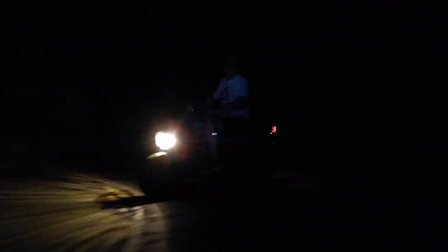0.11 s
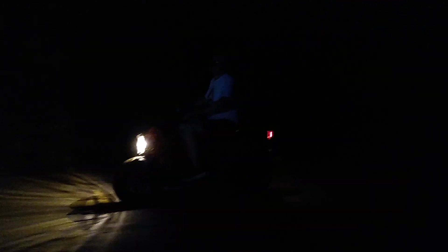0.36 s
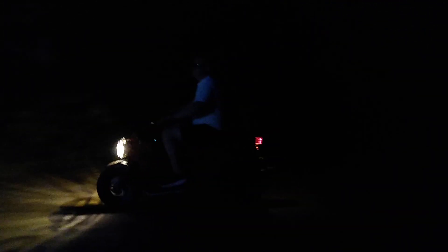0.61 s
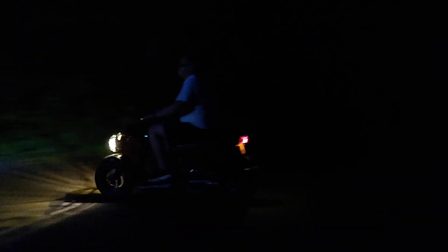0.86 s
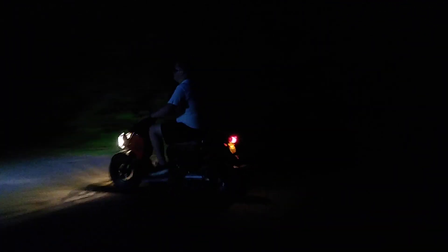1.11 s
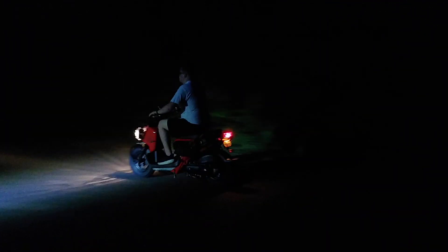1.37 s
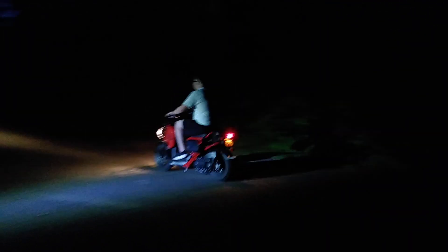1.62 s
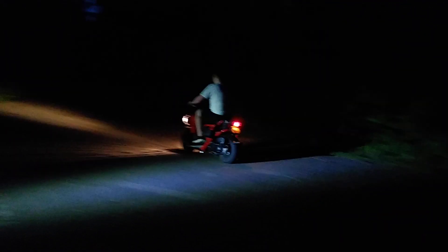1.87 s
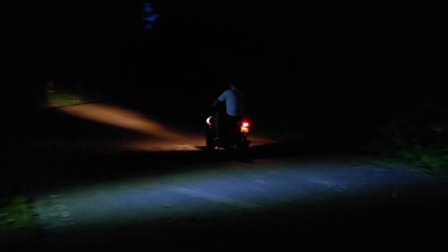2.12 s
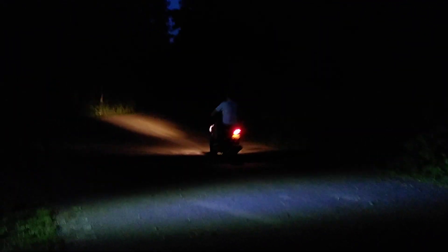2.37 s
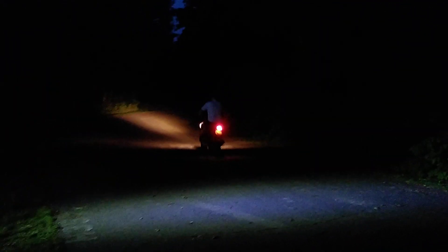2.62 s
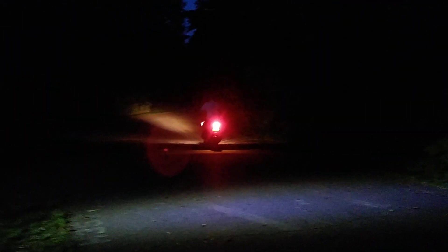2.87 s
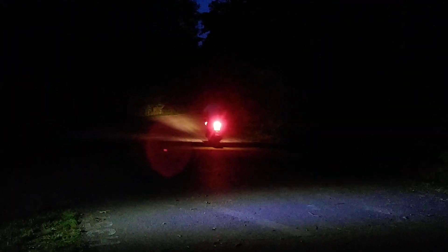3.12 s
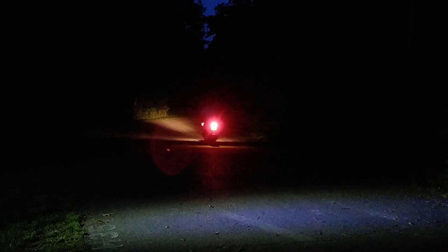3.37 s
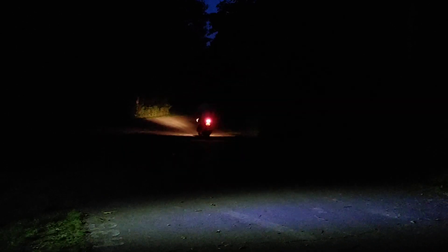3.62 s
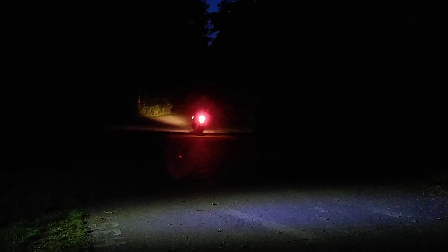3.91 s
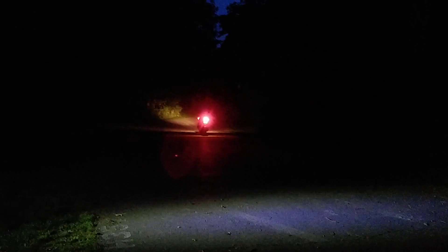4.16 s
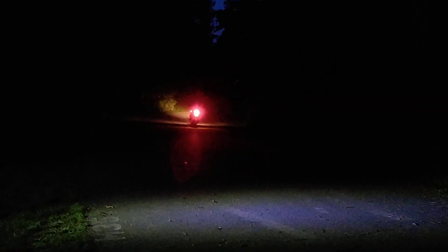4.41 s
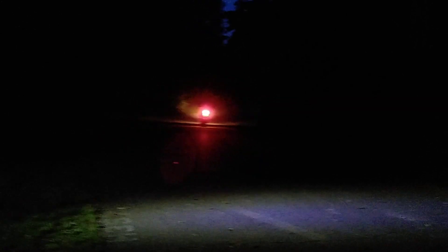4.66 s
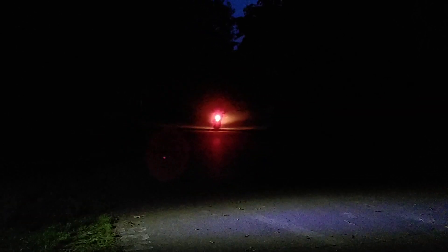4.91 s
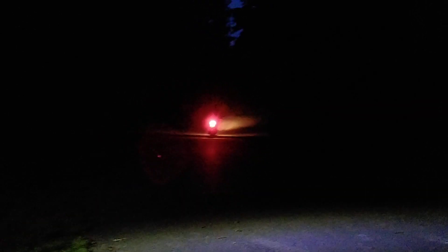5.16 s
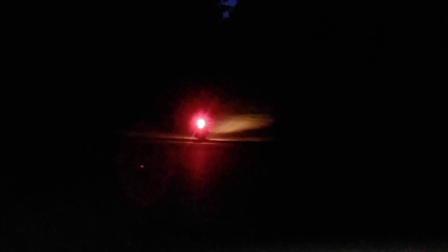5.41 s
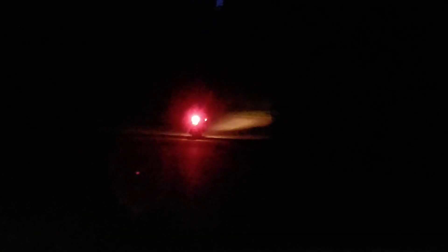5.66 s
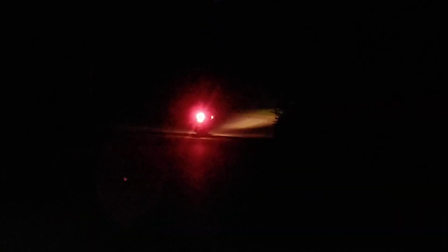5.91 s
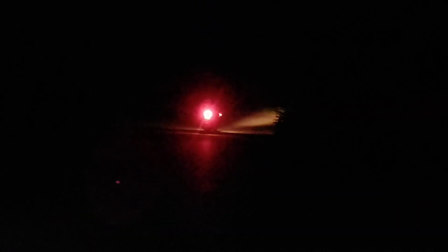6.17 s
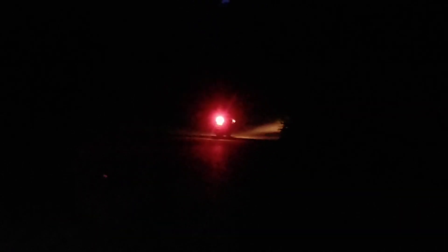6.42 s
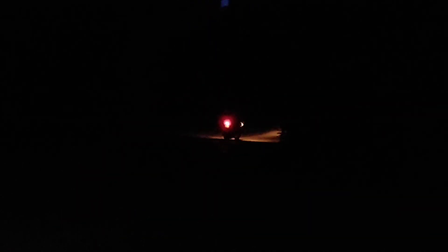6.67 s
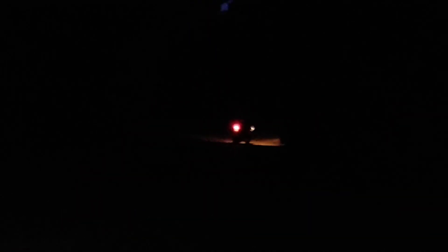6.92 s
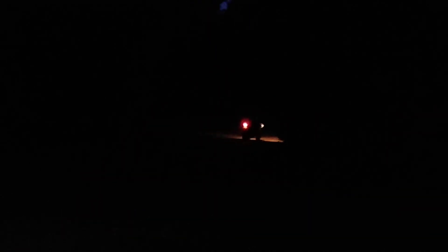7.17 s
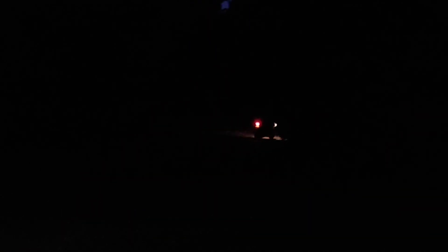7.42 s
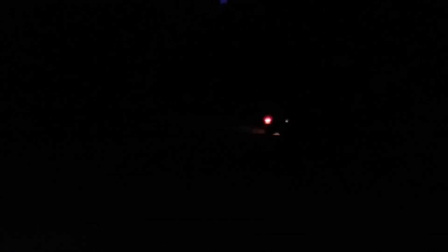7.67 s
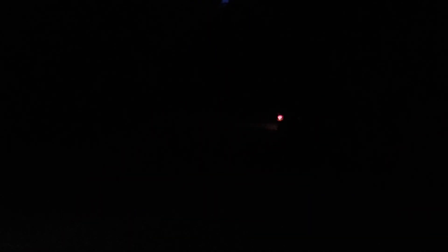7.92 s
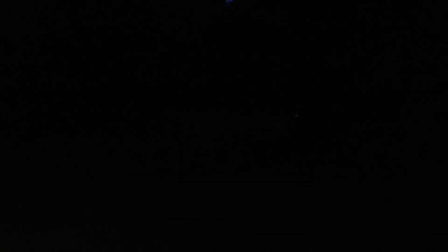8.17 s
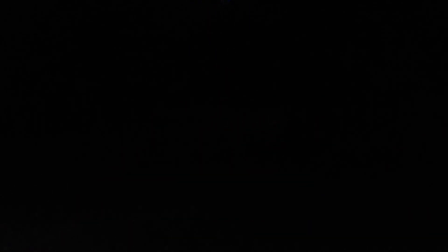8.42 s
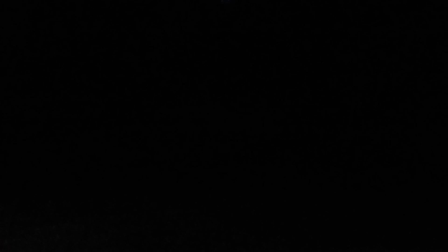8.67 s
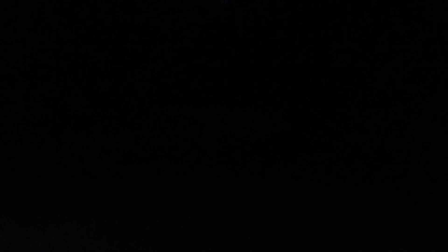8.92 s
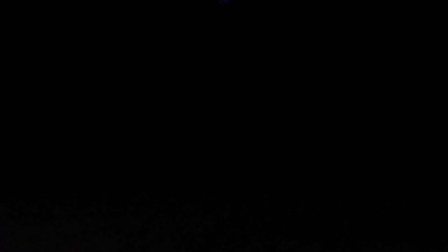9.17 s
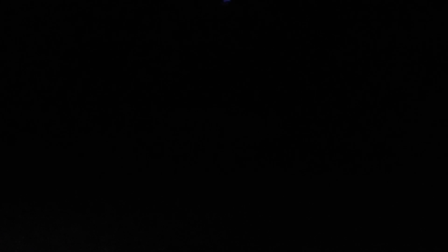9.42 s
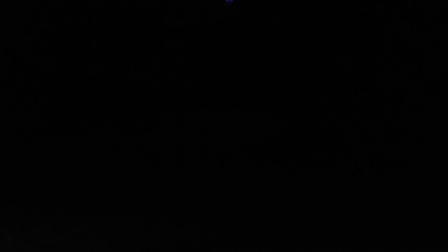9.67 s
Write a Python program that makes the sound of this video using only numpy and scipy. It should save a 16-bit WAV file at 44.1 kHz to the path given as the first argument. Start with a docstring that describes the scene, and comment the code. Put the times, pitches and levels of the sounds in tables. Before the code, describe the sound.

From 0 s a small single-cylinder scooter is already close, engine pulling at about 43 firings per second: a low rapid putter with crank hum, intake growl, mechanical clatter and pulsing airy hiss. Around 1 s a bright metallic buzz swells as it passes, then the sound gradually darkens and falls. Tiny grit ticks occur near 0.1 and 2.5 s, with a soft scuff near 3 s. At 3.2 s the throttle snaps shut; level drops and the pitch sinks, the firing becoming lumpy with missed beats. From 4.3 to 8.3 s a very faint, wavering gear whine accompanies the receding coast. Quick, quiet cricket chirps emerge after about 4.5 s over a thin steady trill, soft night air and distant road murmur. Around 8.5 s the far engine opens up again, smoothly rising but remaining faint until the end at 9.8 s. Outdoor stereo pickup, treble leaning left.

```python
"""On a night road a small single-cylinder four-stroke scooter pulls away from the listener, coasts with
the throttle shut, missing some firings, and opens up again far off. Its exhaust, crank, intake and
casing are pulses, sines and noise locked to the engine cycle and shaped by resonances. Grit ticks are
noise bursts, crickets are sliding or pulsed tones, and the night air is steady shaped noise."""
import sys
import numpy as np
from scipy import signal
from scipy.fft import rfft, irfft, next_fast_len
from scipy.io import wavfile
from scipy.ndimage import uniform_filter1d, map_coordinates

SR = 44100
rng = np.random.default_rng(int(sys.argv[2]) if len(sys.argv) > 2 else 0)


def store_pcm(level_fs):
    """Save levels as 16-bit WAV."""
    pcm = np.round(np.clip(level_fs, -1, 1) * 32767).astype(np.int16)
    wavfile.write(sys.argv[1], SR, np.atleast_2d(pcm).T)


def gain_from_decibels(decibels):
    """Convert decibel values to linear amplitude factors."""
    exponent = np.asarray(decibels, float) / 20
    return 10 ** exponent


N = 431738  # length [samples]

# throttle: (time [s], opening [0-1])
THROTTLE = [(0, 1), (3.2, 1), (3.28, 0), (8.45, 0), (8.7, .75), (9.79, .8)]
# engine speed: (time [s], firing rate [1/s])
FIRING_RATE = [(0.0, 43.2), (0.35, 43.7), (1.03, 43.2), (2.34, 43.3), (2.92, 44.2), (3.22, 43.2),
               (3.35, 40.7), (3.54, 39.2), (4.12, 37.1), (5.07, 35.5), (7.14, 33.1), (7.88, 33.1),
               (8.42, 32.1), (8.53, 32.6), (8.7, 34.8), (8.92, 37.3), (9.24, 38.8), (9.79, 40.1)]
# scooter drawing away: (time [s], loss by distance [dB], share of the tail turned to the listener [0-1])
PATH = [(0, -2.5, 0.4), (.4, -.5, 0.4), (.95, -0.5, 0), (1.4, -1.5, 0.9), (2, -3.5, 0.5), (2.6, -5, 0.5),
        (3.1, -6.5, .9), (3.4, -10, 1), (4.1, -13.5, 1), (4.3, -14, 1), (5.3, -15.5, 0.9),
        (5.7, -18.5, 0.6), (6.3, -21, .7), (7.1, -21, 0), (7.8, -23, 0.3), (8.6, -26.5, 0.2),
        (9.1, -27.5, 0.3), (9.79, -28.5, 1)]
# exhaust note and the crank hum under it: (time [s], note level [dB], hum level [dB])
EXHAUST = [(0.0, -42, -45), (0.08, -42.5, -43.5), (0.92, -38.5, -46), (1.63, -45, -42), (2.31, -48, -49),
           (2.67, -47.5, -48.5), (3.22, -52.5, -51), (3.27, -47.5, -47.5), (3.68, -52, -46),
           (4.91, -53, -59), (5.78, -58, -70), (7.44, -64, -62), (7.66, -70, -65), (7.85, -63.5, -61),
           (9.0, -64, -72.5), (9.79, -64.5, -65.5)]
# levels over the exhaust note: (pulling [dB], coasting [dB])
THUMP_OVER_NOTE = (0.5, 1)
BARK_OVER_NOTE = (-13.5, -15)
# change of the bark with loss by distance [dB per dB]
BARK_PER_LOSS = -0.15
# intake, casing, gas jet and heat shield: (level when nearest [dB], fading over the loss by distance [dB per dB],
# gain from the tail [dB], gain with the throttle shut [dB])
INTAKE_LEVEL = (-41.5, 1.26, 0.5, 1.5)
CASING_LEVEL = (-41.5, 1.11, 1, 0.5)
JET_LEVEL = (-40.5, 1.59, -0.5, 2.5)
SHIELD_LEVEL = (-52.5, 1.64, 4.5, -4.5)
# heat shield swinging past the listener: (gain [dB], time [s], stay [s])
SHIELD_FACES = (9.8, 1.06, 0.27)
# resonances of tail pipe, silencer after-ring, air box and heat shield:
# (frequency [Hz], width [Hz], relative level [dB])
TAIL_PIPE = [(309, 360, 0)]
SILENCER = [(143, 26, 0)]
AIR_BOX = [(469, 105, 3.5), (644, 140, 2)]
SHIELD = [(4593, 370, 0.5), (4910, 80, -2.5)]
# bands of body rattle: (frequency [Hz], width [Hz], relative level [dB], time when loudest [s], stay [s])
RATTLE = [(790, 33, 1, 6.3, 0.81), (1064, 230, -1, 2.4, 2.6), (1710, 170, 0.5, 1.18, 0.67),
          (2006, 105, 4.5, 3.36, 1.3), (2244, 200, 6.5, 1.28, 0.93), (3050, 150, 0, 0.32, 0.38),
          (1584, 170, 1.5, 1.34, 0.34), (2740, 160, 1, 2.46, 0.21), (3760, 250, -1, 1.1, 0.75),
          (1860, 280, 4, 9.8, 0.84), (2700, 310, 3.5, 8.6, 1.8)]
# magneto poles and timing chain teeth, before their common gain:
# (multiple of the firing rate [1], pulling [dB], coasting [dB])
WHINES = [(12, -18, -16), (34, -18, -25), (36, -17, -25)]
# final drive whine: (time [s], pitch [Hz], level [dB])
GEARS = [(4.3, 1640, -75), (5.3, 1600, -69), (6, 1560, -71), (6.8, 1520, -74), (7.3, 1470, -82),
         (7.9, 1420, -77), (8.3, 1400, -79)]
# reflection off the road: (time [s], extra delay [ms], strength [0-1])
BOUNCE = [(0, 0.1, 0.2), (7.2, 0.22, 0.22), (7.8, 0.22, 0.6), (8.5, 0.26, 0.8), (9, 0.2, 0.06),
          (9.79, 0.89, 0.1)]
# noise spectra of casing, gas jet, night air and far road murmur: (frequency [Hz], relative density [dB per Hz])
CASING = [(410, -28), (700, -21.5), (783, -3.5), (1130, -5.5), (1530, -3.5), (1670, -4.5), (2780, -7),
          (4150, -18.5), (5390, -19), (5920, -26.5), (6500, -59), (8450, -36), (14300, -120)]
JET = [(3240, 7.5), (5500, 2.5), (5990, -0.5), (6690, -0.5), (8040, -1), (8950, 1.5), (14600, 1),
       (16000, -4.5), (16500, -42)]
NIGHT_AIR = [(380, -28), (650, 1), (1130, -12), (1360, -8.5), (2350, 3.5), (2760, 1), (3430, -11),
             (4990, -3), (5480, -3.5), (6180, -16), (14000, -12), (16000, -27)]
ROAD_MURMUR = [(30, -14), (55, 0), (150, -1), (450, -6.5), (700, -14), (1000, -31)]
# grit ticks and a scuff under the tyres:
# (time [s], level before filtering [dB], decay [s], left minus right [dB], band centre [Hz])
GRIT = [(0.05, -32.5, 0.00061, 4, 10900), (0.093, -38, 0.0033, 5, 13100), (2.448, -27, 0.00046, -6, 13000),
        (2.503, -31, 0.00092, -3, 14000), (2.98, -45.5, 0.042, -9, 11200), (4.274, -38, 0.0021, -6, 2500)]
# first wing stroke of each bush cricket chirp: (time [s])
BUSH_CHIRPS = [4.97, 5.2, 5.5, 5.81, 6.115, 6.38, 6.645, 6.91, 7.16, 7.445, 7.735, 8.005, 8.29, 8.595, 8.87,
               9.145, 9.415, 9.735]
# first wing stroke of each field cricket chirp: (time [s])
FIELD_CHIRPS = [4.58, 4.88, 5.14, 5.5, 5.86, 6.25, 6.59, 6.96, 7.29, 7.64, 7.97, 8.58, 8.915, 9.23, 9.505,
                9.75]
# microphone ports: (frequency [Hz], left-right likeness [0-1])
LIKENESS = [(60, 0.67), (110, 1), (200, 0.99), (380, 0.88), (700, 0.93), (1290, 0.65), (2380, 0.23),
            (4400, 0.27), (8120, 0.16), (15000, 0.04)]
# microphone ports: (frequency [Hz], left minus right [dB])
LEFT_TILT = [(60, 0.5), (130, 1.5), (290, 1.5), (640, 2.5), (1410, 0), (3100, 4), (6820, 5), (15000, 9.5)]


def unit(x):
    """Normalisation to unit rms."""
    return x / np.sqrt(np.mean(x ** 2) + 1e-20)


def along(points, hz):
    """Interpolation of (Hz, value) points on a logarithmic frequency axis."""
    f, v = np.transpose(points)
    return np.interp(np.log(hz + 1), np.log(f + 1), v)


def curves(rows):
    """Linear interpolation in time: one value per sample for each column after the time."""
    s, *cols = np.transpose(rows)
    return [np.interp(np.arange(N) / SR, s, c) for c in cols]


def wobble(rate):
    """Smooth random modulation, with rate knots a second."""
    return map_coordinates(rng.standard_normal(int(N * rate / SR) + 4), [np.arange(N) * rate / SR])


def by_load(opening, pulling, coasting):
    """Linear blend between the pulling and the coasting value by throttle opening."""
    return opening * pulling + (1 - opening) * coasting


def filtered(x, response):
    """Linear filtering: multiplication by a complex response of frequency."""
    m = next_fast_len(N + 8192)
    return irfft(rfft(x, m) * response(np.fft.rfftfreq(m, 1 / SR)), m)[..., :N]


def resonances(modes):
    """Modal sum of causal second-order resonances, with alternating signs."""
    def response(f):
        total = 0
        for k, (centre, width, db) in enumerate(modes):
            damping = 1j * f * width
            total = total + (-1) ** k * gain_from_decibels(db) * damping / (centre * centre - f * f + damping)
        return total
    return response


def ports(a, b, locked):
    """Partial coherence: a reaches both ports alike; b, and a shifted in phase by the share locked, oppose."""
    def responses(hz):
        angle = np.arccos(np.clip(along(LIKENESS, hz), -1, 1)) / 2
        share = np.clip(locked, 0, 1) / (1 + (hz / 7000) ** 2)
        shift = 1j * np.tanh((hz - 1500) / 300) * share * np.sin(angle)
        return [np.cos(angle), shift, np.sqrt(1 - share ** 2) * np.sin(angle)]
    mid, shifted, other = filtered(np.array([a, a, b]), responses)
    return np.array([mid + shifted + other, mid - shifted - other])


def rush(spectrum, gate, patchy_db, locked=0.81):
    """Turbulence as stereo noise of unit rms, pulsed by gate, with random gain in patches of time and pitch."""
    z = signal.stft(gate * rng.standard_normal((2, N)), nperseg=512)[2]
    field = uniform_filter1d(rng.standard_normal(z.shape[1:]), 4, 0)
    field = uniform_filter1d(field, 20, 1)
    pair = signal.istft(z * gain_from_decibels(patchy_db * unit(field)), nperseg=512)[1][:, :N]
    shaped = filtered(pair, lambda hz: gain_from_decibels(along(spectrum, hz)))
    return unit(ports(*shaped, locked))


def repeating(turns, rate):
    """Cyclostationary noise: valves, chain and piston strike at the same crank angles; the pattern drifts."""
    patterns = rng.standard_normal((int(N * rate / SR) + 4, 256))  # drifting patterns x places in the cycle
    return map_coordinates(patterns, [np.arange(N) * rate / SR, np.mod(turns, 1) * 255], order=1)


def scooter():
    """Superposition of exhaust, crank, intake and casing, all locked to the cycle of two crank turns."""
    opening, = curves(THROTTLE)
    thump_db, bark_db, hum_db, intake_db, casing_db, jet_db, shield_db = levels(opening)
    turns, starts, u, size = engine_cycle(opening)
    puff = size * np.exp(-np.mod(u, 1) / 0.34) * np.clip(np.mod(u, 1) / 0.14, 0, 1)  # jet after each blow-down
    low = gain_from_decibels(thump_db) * exhaust_thump(opening, u, size) + gain_from_decibels(bark_db) * exhaust_bark(u, size)
    low = low + gain_from_decibels(hum_db) * crank_hum(opening, turns) + gain_from_decibels(intake_db) * intake(opening, turns, starts)
    body = gain_from_decibels(casing_db) * casing(opening, turns) + heat_shield(puff, shield_db)
    jet = gain_from_decibels(jet_db + 0.27 * wobble(7.5)) * gas_jet(opening, puff)
    return low + bounced(body + gears()) + jet


def levels(opening):
    """Propagation and directivity: level in dB of each part from distance, heading and throttle."""
    loss_db, tail = curves(PATH)
    note_db, hum_db = curves(EXHAUST)
    parts = [near_db + fades * loss_db + tail_db * np.clip(tail, 0, 1) + shut_db * (1 - opening)
             for near_db, fades, tail_db, shut_db in (INTAKE_LEVEL, CASING_LEVEL, JET_LEVEL, SHIELD_LEVEL)]
    thump_db = note_db + by_load(opening, *THUMP_OVER_NOTE)
    bark_db = note_db + by_load(opening, *BARK_OVER_NOTE) + BARK_PER_LOSS * loss_db
    return [thump_db, bark_db, hum_db, *parts]


def engine_cycle(opening):
    """Phase of the four-stroke cycle, the integral of firing rate, with its starts and firing strengths."""
    rate, = curves(FIRING_RATE)
    turns = np.cumsum(rate * (1 + .002 * wobble(15))) / SR + .02  # in cycles of two crank turns
    cycle = turns.astype(int)
    starts = np.flatnonzero(np.diff(cycle, prepend=-1))
    luck = rng.random((len(starts), 3))
    size = firings(opening[starts], luck[:, :2])[cycle]
    u = turns - cycle - .5  # place in the cycle, 0 when the exhaust valve opens
    u = u - .04 * (1 - opening) * (luck[cycle, 2] - .5)  # a thin charge burns early or late
    return turns, starts, u, size


def firings(opening, luck):
    """Charge starvation: with the throttle shut the cylinder misses once the charge has run thin."""
    size, run = np.ones(len(luck)), 0  # run: firings since the last miss
    for k, (risk, spread) in enumerate(luck):
        missed = risk < (1 - opening[k]) * [0, .25, .7, .9][min(run, 3)]
        size[k] = (.33 if missed else 1) * gain_from_decibels((4 - opening[k]) * (spread - .5))
        run = 0 if missed else run + 1
    return size


def exhaust_thump(opening, u, size):
    """Blow-down: one pressure swing, as long as the valve timing makes it and sharper under load."""
    window = np.exp(-(u / (.14 - 0.012 * opening)) ** 2)
    swing = size * np.sin(2 * np.pi * (3.83 + .5 * opening) * u - .3) * window
    after_ring = (.7 - 0.4 * opening) * filtered(swing, resonances(SILENCER))
    # gas churning in the silencer
    rumble = rush([(40, -18), (75, 3.5), (130, -4.0), (220, 3.5), (400, -30.0)], 1, patchy_db=3.0)
    return unit(swing + after_ring) + gain_from_decibels(-8.5 - 5 * opening) * rumble


def exhaust_bark(u, size):
    """Impulsive excitation: the steep front of the blow-down swing rings the tail pipe."""
    edge = -size * np.exp(-((u + .06) / .02) ** 2)
    return unit(filtered(edge, lambda f: resonances(TAIL_PIPE)(f) ** 2))


def crank_hum(opening, turns):
    """Periodic forcing: a sine once per crank turn and, with the throttle open, one per two turns."""
    per_turn = (.45 + .55 * opening) * gain_from_decibels(.8 * wobble(8)) * np.sin(4 * np.pi * turns - .6)
    per_cycle = gain_from_decibels(-8.5) * opening * np.sin(2 * np.pi * turns - 1.2)
    return np.sqrt(2) * (per_turn + per_cycle)


def intake(opening, turns, starts):
    """Cavity resonance: the intake valve snaps open half a cycle away and rings the air box."""
    gulps = np.zeros(N)
    gulps[starts] = gain_from_decibels(2.5 * rng.standard_normal(len(starts)))
    gulps = unit(gulps) + 3.5 * repeating(turns, rate=1.6)  # valve gear keeps the box ringing between gulps
    box = unit(filtered(gulps, lambda f: resonances(AIR_BOX)(f) ** 2))
    # air through the filter
    draught = rush([(200, -25), (420, -3), (650, 0), (800, -12), (1500, -40)], 1, patchy_db=1.5)
    return gain_from_decibels(-3.5 - 8 * (1 - opening)) * box + gain_from_decibels(-2.5 - .5 * opening) * draught


def casing(opening, turns):
    """Structure-borne sound: clatter pulsing with the crank, knocks as body rattle, and whines."""
    clatter = rush(CASING, 1 + 0.11 * np.cos(4 * np.pi * turns), patchy_db=1.5)
    rattle = body_rattle(repeating(turns, rate=4.5))
    whine = np.zeros(N)
    for order, pulling_db, coasting_db in WHINES:
        level_db = by_load(opening, pulling_db, coasting_db) + 2 * wobble(4)
        whine += gain_from_decibels(level_db) * np.sin(2 * np.pi * order * turns)
    return gain_from_decibels(-1.0) * clatter + gain_from_decibels(-3.0) * rattle + gain_from_decibels(5) * whine


def body_rattle(knocks):
    """Resonant response: the knocks ring bands of body rattle, each swelling around its own time."""
    t = np.arange(N) / SR
    rings = np.zeros(N)
    for hz, width, db, s, stay in RATTLE:
        swell = 0.28 + np.exp(-((t - s) / stay) ** 2)
        rings += swell * gain_from_decibels(1.36 * wobble(3.03)) * filtered(knocks, resonances([(hz, width, db)]))
    return unit(ports(rings, np.roll(rings, SR // 8), locked=0.95))


def gas_jet(opening, puff):
    """Jet noise: hiss that swells with the gas puff of each firing, plus the steady hiss of the drive belt."""
    hiss = rush(JET, 1 + (1.2 + 0.95 * opening) * puff, patchy_db=1.46)
    belt = rush([(9500, -14.5), (11300, -2.5), (13200, -20)], 1, patchy_db=.8)
    return hiss + gain_from_decibels(-11 - 3 * opening) * belt


def heat_shield(puff, level_db):
    """Forced plate resonance: puffing noise rings the shield, louder as it swings past the listener."""
    faces_db, faces_s, stay_s = SHIELD_FACES
    level_db = level_db + faces_db * np.exp(-((np.arange(N) / SR - faces_s) / stay_s) ** 2)
    noise = (0.27 + puff) * rng.standard_normal((2, N))
    ring = filtered(noise, lambda f: resonances(SHIELD)(f) ** 2)
    return gain_from_decibels(level_db) * unit(ports(*ring, locked=1.0))


def gears():
    """Gear meshing: the final drive sings with the wheel, heard while the engine coasts."""
    hz, db = curves(GEARS)
    t = np.arange(N) / SR
    heard = np.clip(np.minimum(t - GEARS[0][0], GEARS[-1][0] - t) / 0.14, 0, 1)  # fades in and out
    tone = np.sin(2 * np.pi * np.cumsum(hz * (1 + 0.00623 * wobble(40))) / SR)
    return gain_from_decibels(db + 2.0 * wobble(25)) * heard * tone * np.ones((2, 1))


def bounced(x):
    """Comb interference: a second path off the road cancels a band that slides as the scooter moves."""
    delay_ms, strength = curves(BOUNCE)
    arrival = np.arange(N) - delay_ms * SR / 1000
    late = np.array([np.interp(arrival, np.arange(N), c) for c in x])
    return (x + strength * late) / np.sqrt(1 + strength ** 2)


def grit():
    """Transient excitation: short bursts of noise, each in one wide band."""
    out, t = np.zeros((2, N)), np.arange(N) / SR
    for s, db, length, left_db, hz in GRIT:
        envelope = np.exp(-np.abs(t - s) / length * np.where(t < s, 4, 1))  # rises four times faster than it falls
        burst = filtered(envelope * rng.standard_normal(N), resonances([(hz, .8 * hz, 0)]))
        out += gain_from_decibels(db + np.array([[.5], [-.5]]) * left_db) * burst
    return out


def chirps(table, db, hz, fall_hz, gap, length, rasp):
    """Stridulation: three wing strokes [gap, length in s] a chirp slide down in pitch, raspy by the file's teeth."""
    out, t = np.zeros(N + SR), np.arange(int(.03 * SR)) / SR
    for s, luck in zip(table, rng.standard_normal((len(table), 6))):
        for k in range(3):
            pitch = hz * (1 + 0.013 * luck[k]) - fall_hz * (t / length - .5)
            envelope = np.sin(np.pi * np.clip(t / length, 0, 1))
            stroke = envelope * np.sin(2 * np.pi * np.cumsum(pitch) / SR)
            first = round((s + k * gap) * SR)
            out[first:][:len(t)] += gain_from_decibels(db + 2 * luck[3 + k]) * stroke
    return out[:N] * (1 + rasp * wobble(900))  # the rasp is a fast random modulation


def trill():
    """Amplitude modulation: a far cricket trills without pause, about forty strokes a second."""
    beat = np.cumsum(39.2 + 0.77 * wobble(1.5)) / SR
    strokes = (.4 + np.cos(np.pi * beat) ** 2) * gain_from_decibels(1.3 * wobble(1.74))
    tone = filtered(rng.standard_normal((2, N)), lambda f: resonances([(5440, 200, 0)])(f) ** 2)
    return gain_from_decibels(-79.5) * unit(strokes * tone)


def night_air():
    """Diffuse ambient noise: the night air over a far road murmur."""
    air = gain_from_decibels(-73.5) * rush(NIGHT_AIR, 1, patchy_db=3.0, locked=0)
    murmur = gain_from_decibels(-74) * rush(ROAD_MURMUR, 1, patchy_db=0.5, locked=0)
    return air + murmur


def scene():
    """Linear superposition of scooter, grit and insects over the night air."""
    bush = chirps(BUSH_CHIRPS, db=-77, hz=13800, fall_hz=2600, gap=0.028, length=.013, rasp=0.9)
    bush = bush * gain_from_decibels([[2.5], [-2.5]])  # towards the left
    field = chirps(FIELD_CHIRPS, db=-72.5, hz=4680, fall_hz=300, gap=0.03, length=0.022, rasp=0.53)
    return scooter() + grit() + bush + field + trill() + night_air()


def top_cut(x):
    """Nothing passes above the cut-off."""
    return signal.sosfilt(signal.butter(12, 16680, fs=SR, output="sos"), x)


def record(dry):
    """Transducer response: the microphone drops the deepest bass; its left port hears more treble."""
    def microphone(hz):
        tilt = gain_from_decibels(np.array([[.5], [-.5]]) * along(LEFT_TILT, hz))
        bass_cut = 1 + (36 / (hz + 1)) ** 8
        return tilt / bass_cut
    return top_cut(filtered(dry, microphone))


dry = scene()
out = record(dry)
store_pcm(out)
```